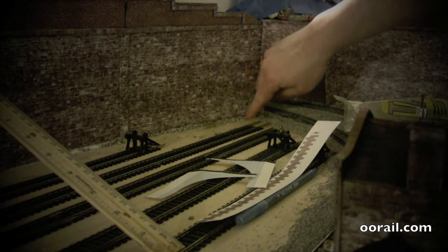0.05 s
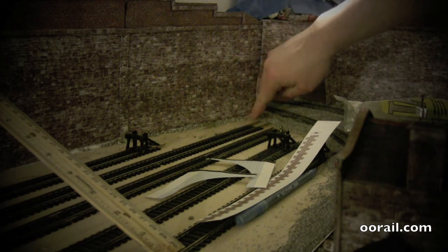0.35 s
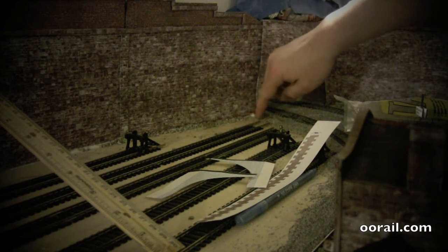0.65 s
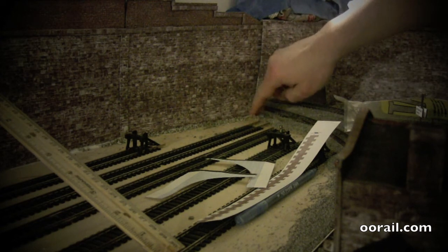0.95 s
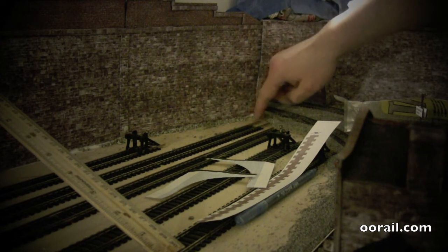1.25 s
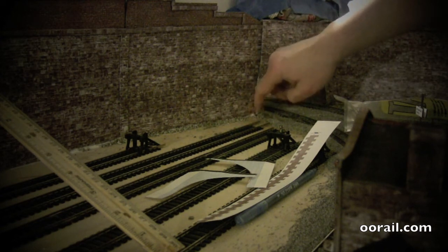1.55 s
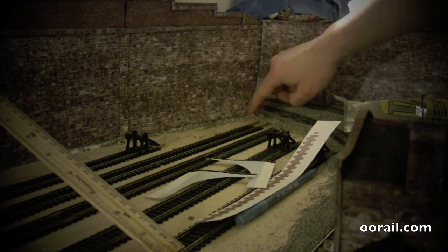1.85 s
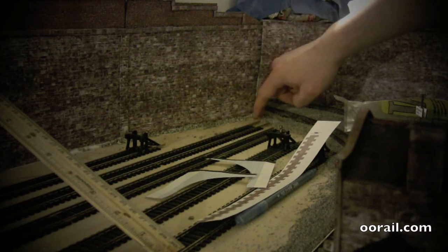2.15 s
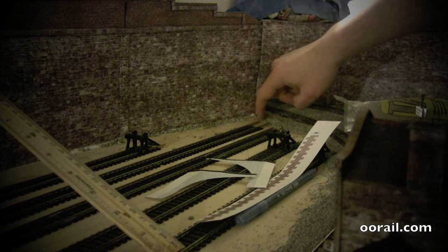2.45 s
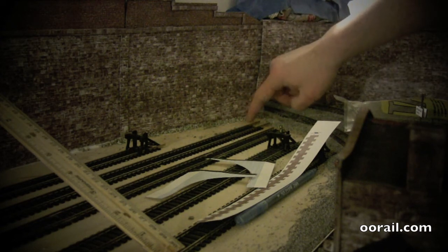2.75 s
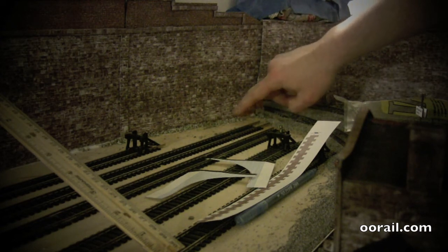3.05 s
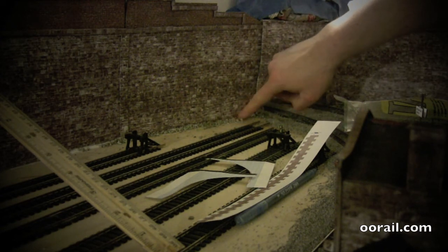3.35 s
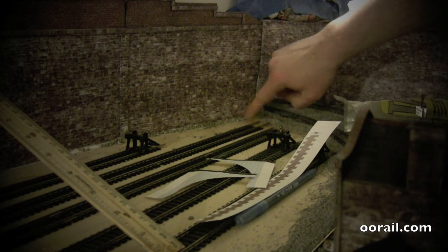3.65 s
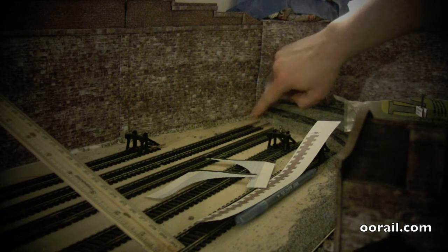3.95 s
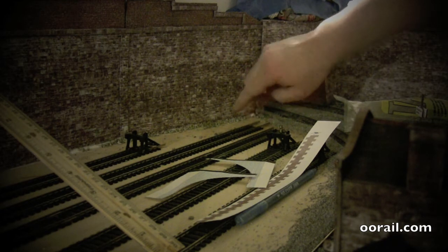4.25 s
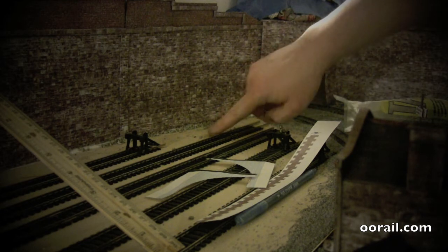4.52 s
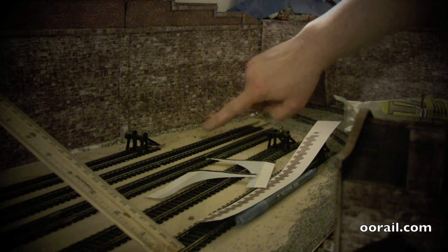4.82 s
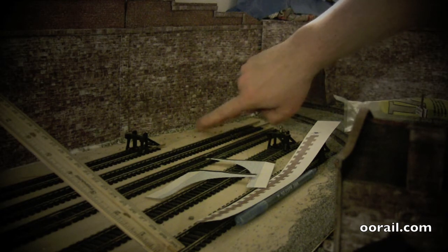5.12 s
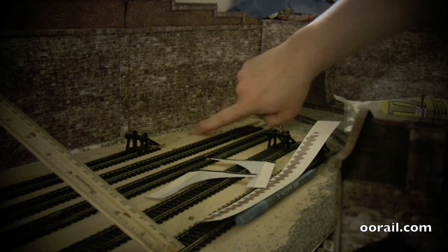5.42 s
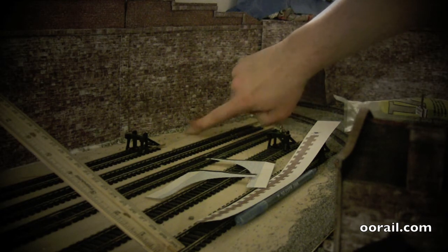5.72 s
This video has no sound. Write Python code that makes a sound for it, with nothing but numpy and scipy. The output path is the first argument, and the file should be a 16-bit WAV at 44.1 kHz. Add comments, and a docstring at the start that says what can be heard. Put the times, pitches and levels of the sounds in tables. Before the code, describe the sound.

A fingertip rubs fine grit along a board in uneven, scratchy strokes with small grain clicks, over low room noise.

```python
"""A fingertip rubs fine grit along a model railway board, close to a brick wall in a small room.
From the start, over low room noise, each stroke is a shower of tiny grain contacts; pressure makes
the board sound, the skin judders as it drags, and the wall throws everything back. Single grains snap
and skip, loudly near 2.9 s. The hardest rubbing comes at 4.5-5.1 s; lighter strokes follow until 6 s."""
import sys
import numpy as np
from scipy import signal
from scipy.fft import rfft, irfft
from scipy.io import wavfile
from scipy.ndimage import uniform_filter1d, map_coordinates

SR = 44100
rng = np.random.default_rng(int(sys.argv[2]) if len(sys.argv) > 2 else 0)


def log_audio(samples):
    """Write samples as a 16-bit WAV file to the path given in sys.argv[1]."""
    # one column per channel
    frames = np.atleast_2d(samples).T
    # limit to full scale, then quantise
    limited = np.clip(frames, -1, 1)
    pcm = np.round(limited * 32767).astype(np.int16)
    wavfile.write(sys.argv[1], SR, pcm)


N = 263718


def amp(db):
    """Decibels to gain."""
    return 10 ** (np.asarray(db) / 20)


def unit_rms(x):
    """Scales to rms 1."""
    return x / np.sqrt(np.mean(x ** 2) + 1e-20)


def at_hz(points, hz):
    """Interpolates a table over log frequency."""
    table_hz, value = np.transpose(points)
    return np.interp(np.log(hz + 1), np.log(table_hz + 1), value)


def convolve(x, response):
    """Convolution cut to N samples."""
    return signal.fftconvolve(x, response)[:N]


def colour(x, spectrum, size=4096):
    """Causal filter of energy 1 with the given spectrum."""
    log_gain = np.log(amp(at_hz(spectrum, abs(np.fft.fftfreq(size, 1 / SR)))))
    response = np.fft.ifft(np.exp(np.conj(signal.hilbert(log_gain)))).real[:size // 2]
    return convolve(x, response / np.linalg.norm(response))


def envelope(rows):
    """Smoothed gain from (time [s], level [dB]); silent outside the rows."""
    level_db = np.interp(np.arange(N) / SR, *np.transpose(rows), left=-np.inf, right=-np.inf)
    return uniform_filter1d(amp(level_db), size=90)


def swell(peak_s, rise_s, fall_s, edge_db=-20, rise_curve=1.5, fall_curve=1.3):
    """Force builds and lets go; gain is edge_db at rise_s before the peak and fall_s after."""
    t = np.arange(N) / SR - peak_s
    active = (t > -4 * rise_s) & (t < 4 * fall_s)
    before = np.maximum(-t[active] / rise_s, 0) ** rise_curve
    after = np.maximum(t[active] / fall_s, 0) ** fall_curve
    gain = np.zeros(N)
    gain[active] = amp(edge_db * (before + after))
    return gain


def pushes(rows):
    """Gain of a series of pushes; overlaps add in power."""
    return np.sqrt(sum((amp(db) * swell(peak_s, rise_s, fall_s)) ** 2
                       for peak_s, rise_s, fall_s, db in rows))


def contacts(per_s, spread_db):
    """Random clicks of uneven size, levelled to power near 1 over 20 ms."""
    occurs = rng.random(N) < per_s / SR
    size_db = spread_db * np.minimum(rng.exponential(1, N), 4)
    clicks = occurs * amp(size_db) * rng.choice([-1, 1], N)
    return clicks / np.sqrt(abs(uniform_filter1d(clicks ** 2, size=900)) + 1e-6)


# room noise spectra, mid and side: (frequency [Hz], relative density [dB])
NOISE_MID = [(12, -28), (24, -20), (31, 10.5), (42, -28), (60, 5.5), (85, -4.5), (120, -1.5), (400, -4.5),
             (800, -6), (1400, -15.5), (3000, -17.5), (8000, -23), (15800, -28.5)]
NOISE_SIDE = [(20, -22), (45, -11), (70, -2), (110, 6.5), (300, 4), (450, 0.5), (700, 3), (900, -8),
              (1400, -12), (3000, -18), (8000, -22.5), (15800, -29)]
def room_noise(mid_db=-56.5, side_db=-52):
    """Steady low noise, wide in stereo."""
    mid = amp(mid_db) * unit_rms(colour(rng.standard_normal(N), NOISE_MID, size=16384))
    side = amp(side_db) * unit_rms(colour(rng.standard_normal(N), NOISE_SIDE, size=16384))
    return np.array([mid + side, mid - side])


# room decay: (frequency [Hz], T60 [s])
DECAY_TIMES = [(150, 0.48), (400, 0.29), (1000, 0.24), (2800, 0.3), (7000, 0.26), (15000, 0.22)]
def reverb_tail(near_db, near_s):
    """Dense reflections of energy 1: quick scatter from things nearby, then the room."""
    hz, frame_s, spectra = signal.stft(rng.standard_normal(SR // 2), SR, nperseg=256)
    decay = amp(-60 * frame_s / at_hz(DECAY_TIMES, hz)[:, None])
    tail = signal.istft(spectra * decay, SR, nperseg=256)[1]
    t = np.arange(len(tail)) / SR
    tail = tail * (1 + amp(near_db) * np.exp(-t / near_s)) * (t > 0.001)
    return tail / np.linalg.norm(tail)


def scatter(x, near_db, near_s, count=3, drift_hz=1.694):
    """Crossfaded tails: the reflections shift as the hand moves."""
    t = np.arange(N) / SR
    shares = [np.cos(np.pi * (drift_hz * t + k / count)) * np.sqrt(2 / count) for k in range(count)]
    return sum(convolve(x * share, reverb_tail(near_db, near_s)) for share in shares)


# wall and board echoes: (mean delay [s], gain [ratio])
EARLY_ECHOES = [(.0019, 0.22), (.003, 0.16), (.0065, 0.24)]
# reverb width: (frequency [Hz], side over mid [dB])
REVERB_WIDTH = [(60, -4), (120, -7), (250, -11.5), (600, -12), (1200, -18.5), (2400, -11.5), (4400, -12.5),
                (8000, -3.5), (15000, -3.5)]
def room(x, direct, wet, sway_hz=0.4):
    """Direct sound and echoes lie in the middle; the reverb spreads sideways."""
    t, hz = np.arange(N) / SR, np.fft.rfftfreq(N, 1 / SR)
    reach = 1 + 0.134 * np.sin(2 * np.pi * sway_hz * t)  # hand-to-wall distance drifts
    echoes = sum(gain * map_coordinates(x, [(t - delay_s * reach) * SR], order=3)
                 for delay_s, gain in EARLY_ECHOES)
    mid = direct * (x + echoes) + wet * scatter(x, near_db=7, near_s=0.0087)
    diffuse = convolve(x, reverb_tail(near_db=6, near_s=0.0089))
    side = wet * irfft(rfft(diffuse) * amp(at_hz(REVERB_WIDTH, hz)), N)
    return np.array([mid + side, mid - side])


# board resonances: (frequency [Hz], bandwidth [Hz], relative level [dB])
BOARD_MODES = [(256, 36, 3), (287, 28, -3), (385, 26, 5), (500, 30, -9), (714, 18, 3), (778, 20, -3),
               (915, 50, 1), (985, 25, -6), (1182, 16, -1), (1314, 30, 2), (1389, 16, -5), (1464, 25, -5),
               (1552, 30, -2), (1608, 30, -6), (1760, 30, -6), (1810, 30, -7), (1952, 30, -5),
               (2218, 20, -2), (2350, 55, -3), (2477, 28, -4), (2714, 30, -4), (2810, 70, -4),
               (3150, 70, -3), (3335, 40, -1), (3440, 20, -4), (3720, 130, -3), (4274, 35, -3),
               (4375, 40, -4), (5017, 60, -4), (5459, 30, -1)]
def board_ring(x, gain=0.93, ring_db=-1):
    """The board adds its short modes to every contact."""
    t = np.arange(SR // 4) / SR
    modes = np.zeros(len(t))
    for hz, width_hz, db in BOARD_MODES:
        decay = 2 * np.pi * width_hz / SR * np.exp(-np.pi * width_hz * t)
        modes += amp(db) * decay * np.cos(2 * np.pi * hz * t)
    return gain * (x + amp(ring_db) * convolve(x, modes))


# weight shift: (time [s], level [dB])
SHIFT_LEVELS = [(2.41, -59), (2.44, -57), (2.5, -52), (2.68, -56), (2.8, -55), (2.84, -54)]
# crease spectrum: (frequency [Hz], level [dB])
CREASE_SPECTRUM = [(40, -14), (90, 6), (200, -3), (450, 6.5), (850, -5.5), (1500, -7), (5000, -27.5)]
def hand_shift():
    """Faint, dull creases of skin as the hand shifts its weight."""
    return colour(envelope(SHIFT_LEVELS) * contacts(per_s=90, spread_db=2), CREASE_SPECTRUM)


# light slide: (time [s], level [dB])
SLIDE_LEVELS = [(4.16, -64), (4.28, -57.5), (4.38, -65), (4.48, -61.5), (4.55, -67)]
# skin hiss spectrum: (frequency [Hz], level [dB])
SKIN_SPECTRUM = [(200, -11), (1000, 0), (4000, -3.5), (7500, -3), (11000, 1), (13000, -7), (16000, -18)]
def skin_slide():
    """Skin slides lightly between strokes with a faint, smooth hiss."""
    return colour(envelope(SLIDE_LEVELS) * rng.standard_normal(N), SKIN_SPECTRUM)


# dull taps: (time [s], level [dB], pitch [Hz])
PAD_TAPS = [(0.134, -40.5, 310), (0.635, -50.5, 545), (1.288, -33.5, 974), (2.335, -44, 610),
            (4.139, -40, 278), (5.908, -32.5, 733)]
def pad_taps(level_db=-3, swell_s=0.0043, wobble_rad=0.72):
    """Soft contacts of the finger pad: a few uneven cycles swell and die."""
    out, t = np.zeros(N + SR), np.arange(SR // 10) / SR
    shape = t / swell_s * np.exp(1 - t / swell_s)
    for time_s, db, hz in PAD_TAPS:
        wobble = unit_rms(uniform_filter1d(rng.standard_normal(len(t)), size=60))
        cycles = np.sin(2 * np.pi * hz * t + wobble_rad * wobble)
        start = round(time_s * SR)
        out[start:start + len(t)] += amp(db + level_db) * shape * cycles
    return out[:N]


# dragging presses: (peak time [s], rise [s], fall [s], level [dB])
PAD_DRAGS = [(0.37, 0.12, .05, -52.5), (1.29, .003, 0.022, -34.5), (1.39, 0.18, 0.056, -53),
             (1.79, .02, .13, -53), (2.18, 0.11, .08, -63), (2.92, .055, 0.071, -39.5),
             (3.36, .015, .15, -52), (3.44, 0.032, 0.054, -44.5), (4.145, 0.074, 0.024, -47),
             (4.497, 0.0072, 0.045, -45), (4.605, 0.058, 0.014, -30), (4.662, 0.023, 0.15, -44),
             (4.995, 0.089, 0.12, -36.5), (5.378, 0.009, 0.12, -45), (5.56, .12, .04, -48),
             (5.903, 0.15, 0.076, -48.5)]
# judder spectrum: (frequency [Hz], level [dB])
PAD_SPECTRUM = [(30, -23), (70, -10), (120, -7), (180, -19.5), (250, -2.5), (380, -3.5), (560, -10.5),
                (900, -20), (4000, -35)]
def pad_drags(level_db=-3):
    """The finger pad sticks and slips, shaking the board's low modes."""
    slips = pushes(PAD_DRAGS) * contacts(per_s=500, spread_db=1.5)
    return amp(level_db) * colour(slips, PAD_SPECTRUM)


# board and dust spectra: (frequency [Hz], level [dB])
BOARD_SPECTRUM = [(100, -44), (300, -3), (430, -2), (580, -4.5), (850, 2), (1400, 2), (2000, -5.5),
                  (3500, -28), (12000, -93)]
DUST_SPECTRUM = [(1000, -76), (4500, -18), (7000, 5.5), (9000, 11.5), (12000, 2.5), (16000, -1)]
# coarse and sharp grit spectra: (frequency [Hz], level [dB])
COARSE_SPECTRUM = [(200, -43.5), (900, -24), (1600, -6.5), (2600, 2.5), (3400, -1), (4400, -2.5),
                   (6000, -16), (9000, -23.5), (16000, -31.5)]
SHARP_SPECTRUM = [(200, -29), (1200, -27.5), (2400, -13), (3500, -5.5), (4700, -4.5), (5700, -7),
                  (7000, -11.5), (10000, -17.5), (16000, -30.5)]
def grit(scrape, board, dust):
    """Grit rasps, the board knocks, dust fizzes; the rasp's sharpness follows GRIT_STROKES."""
    peak_s, *_, sharp_db = np.transpose(GRIT_STROKES)
    tilt = amp(np.interp(np.arange(N) / SR, peak_s, sharp_db))
    rasp = colour(scrape, COARSE_SPECTRUM) + tilt * colour(scrape, SHARP_SPECTRUM)
    rasp /= np.sqrt(1 + tilt + tilt ** 2)
    return rasp + colour(board, BOARD_SPECTRUM) + colour(dust, DUST_SPECTRUM)


# single grains: (time [s], level [dB], board share [dB], dust share [dB])
GRAIN_SNAPS = [(0.0014, -33.5, 4, -19), (0.7737, -36, 2, -18), (0.7991, -32.5, -16, -7),
               (0.8457, -31, -5.5, -12), (1.2252, -36, -23, -27), (1.292, -25.5, -6, -28),
               (1.6772, -37, -2, -9), (1.8034, -32.5, -12, 3), (1.8347, -20, -30, -23),
               (2.0673, -33.5, -12, -10), (2.135, -29.5, -25, -25), (2.16, -27, -9.5, -30),
               (2.1879, -20.5, -17, -11.5), (2.4678, -45, -10, -16), (2.5172, -33, -6, -9),
               (2.5514, -29.5, -12, -26), (2.8439, -21, -27, -21), (2.897, -21, 2, -17),
               (2.9021, -23.5, 11, -12), (2.9241, -13.5, -1, -8), (3.0994, -41.5, -5, -3),
               (3.2142, -32, -10, -3), (3.2275, -32, -19.5, -2), (3.2929, -28, -12, -17),
               (3.3056, -27.5, -11, -9), (3.3612, -30.5, 0, -2), (3.4335, -17, 2, -7.5),
               (3.7926, -26.5, -8.5, -21), (4.579, -29, -8, -27), (4.6481, -18.5, -2.5, -29),
               (4.7252, -28.5, -10, -25), (4.7422, -25.5, -21, -10), (4.776, -28.5, -14, -23),
               (4.8453, -31, -22, -11), (4.9561, -23, -28, -26), (4.9781, -12, -27, -33),
               (5.024, -19, -20, -35), (5.378, -25, -13, -19), (5.9105, -40, -9, -12)]
def grain_snaps(scrape_db=9, board_db=11, dust_db=11.5, crumb_gain=0.079, crumb_s=0.0023):
    """A grain snaps or lands: one sharp click and a few milliseconds of crumbs."""
    t = np.arange(SR // 40) / SR
    drives = np.zeros((3, N + len(t)))
    for time_s, db, board_share_db, dust_share_db in GRAIN_SNAPS:
        snap = crumb_gain * rng.standard_normal(len(t)) * np.exp(-t / crumb_s)
        snap[0] = 1
        gains = amp(db) * amp([scrape_db, board_db + board_share_db, dust_db + dust_share_db])
        start = round(time_s * SR)
        drives[:, start:start + len(t)] += np.outer(gains, snap)
    return grit(*drives)


# fingertip resting on grit between two pushes: (time [s], level [dB])
CREEP_LEVELS = [(5.1, -65), (5.2, -61), (5.37, -67)]
# pushes through the grit: (peak time [s], rise [s], fall [s], level [dB],
# board share [dB], dust share [dB], sharp over coarse [dB])
GRIT_STROKES = [ (0.004, 0.013, 0.024, -41, 3.5, -4.5, -5), (0.08, 0.063, .035, -50.5, -1.5, -6, 3),
                (0.375, .085, 0.091, -40, -8, -8.5, -3), (0.49, .025, 0.023, -45.5, -2.5, -10, -10),
                (0.85, 0.075, 0.037, -41.5, -8, -5.5, 9), (0.955, 0.052, 0.027, -61.5, -1, 3, 9),
                (1.294, 0.0087, 0.02, -34, 1.5, -13, -14), (1.39, 0.12, 0.059, -47.5, -1.5, -3, 4),
                (1.806, 0.017, 0.056, -39.5, -5, -3, 2), (1.837, 0.093, .024, -39, -3, -9, -5),
                (2.075, .008, .11, -51, -13, -9, 7), (2.163, 0.036, 0.044, -38.5, -4, -15, -8),
                (2.191, .003, .024, -42, -4, -5, -5), (2.55, 0.068, 0.026, -38.5, -9, -9.5, -4),
                (2.62, 0.053, 0.024, -46.5, -13, -8, 4), (2.851, 0.029, 0.041, -28, -10, -10, 3),
                (2.903, .01, .035, -40.5, 7.5, -8, 4), (2.926, .004, 0.029, -32.5, 5, 0.5, 3),
                (3.23, .015, .018, -41.5, -9.5, -2.5, 31), (3.292, 0.0043, 0.038, -41.5, -2.5, -1.5, 12),
                (3.361, 0.0087, 0.073, -44, 0, -3, 8), (3.434, 0.088, 0.048, -36, 1.5, -3, 11),
                (3.797, 0.019, 0.054, -35, -15, -14, 0), (3.827, 0.03, 0.031, -41, -4.5, -3.5, 1),
                (4.099, 0.029, 0.063, -42.5, -6, -5.5, 2), (4.142, 0.043, 0.017, -51, 3.5, 1, 12),
                (4.53, 0.043, 0.15, -42.5, -3, -10.5, -6), (4.583, .016, 0.07, -26, -3, -11, -20),
                (4.625, .03, 0.054, -30, -21, -12, 0), (4.652, .008, .025, -34.5, 0, -9, 0),
                (4.73, 0.17, 0.16, -48, -5, -6, 17), (4.957, 0.016, 0.074, -36, -5, -13, -20),
                (4.982, 0.0075, 0.022, -22, -9.5, -24, -7), (5.027, 0.027, 0.044, -28.5, -5, -15, -6),
                (5.057, 0.031, .045, -38, -18, -4.5, -5), (5.384, 0.015, 0.064, -41, -1.5, -6, -2),
                (5.435, 0.064, 0.1, -38, -10.5, -10, 5), (5.495, 0.067, 0.12, -40, -10.5, -9, 11),
                (5.57, 0.17, 0.032, -51.5, 7, 2, 1), (5.804, 0.033, 0.15, -44, -9.5, -9.5, 18),
                (5.912, 0.046, 0.027, -47.5, 2.5, -5, 2), (5.97, .05, .05, -51.5, 1, -2, -2), ]
def grit_strokes(scrape_db=-2, board_db=-3, dust_db=-2):
    """Pushed by the fingertip, coarse grains scrape and knock on the board; fine dust fizzes along."""
    peak_s, rise_s, fall_s, db, board_share_db, dust_share_db, _ = np.transpose(GRIT_STROKES)
    creep = envelope(CREEP_LEVELS)
    scrape_gain = pushes(zip(peak_s, rise_s, fall_s, db)) + creep
    board_gain = pushes(zip(peak_s, rise_s, fall_s, db + board_share_db)) + creep
    dust_gain = pushes(zip(peak_s, rise_s, fall_s, db + dust_share_db))
    coarse = contacts(per_s=1300, spread_db=5)
    heavy = contacts(per_s=810, spread_db=4)
    fine = contacts(per_s=2300, spread_db=5.5)
    return grit(scrape=amp(scrape_db) * scrape_gain * coarse,
                board=amp(board_db) * board_gain * unit_rms(1.1 * heavy + coarse),
                dust=amp(dust_db) * dust_gain * unit_rms(fine + 0.79 * coarse))


def scene():
    """Diffuse rubbing and slightly more direct snaps ring with the board, over room noise."""
    rubbing = grit_strokes() + pad_drags() + pad_taps() + skin_slide() + hand_shift()
    stereo = room(rubbing, direct=0.47, wet=0.63) + room(grain_snaps(), direct=0.5, wet=0.62)
    return np.array([board_ring(channel) for channel in stereo]) + room_noise()


def record(dry):
    """Low-pass at 16 kHz."""
    lowpass = signal.firwin(601, 16000, window=("kaiser", 9), fs=SR)
    return signal.oaconvolve(dry, lowpass[None], "same")


dry = scene()
out = record(dry)
log_audio(out)
```